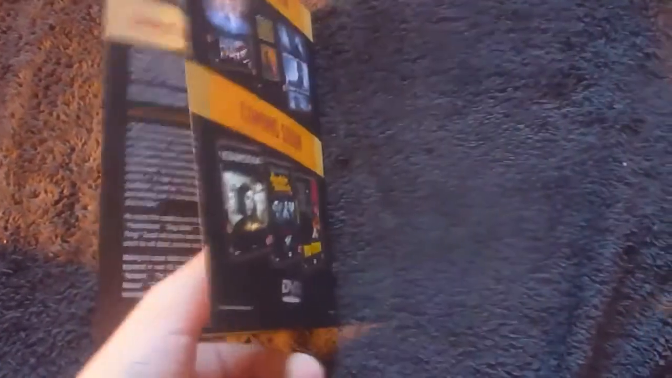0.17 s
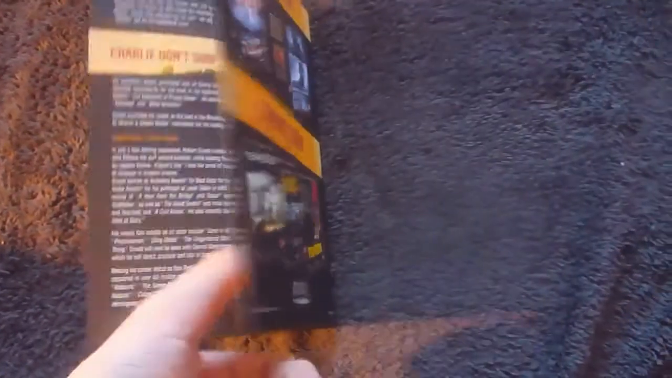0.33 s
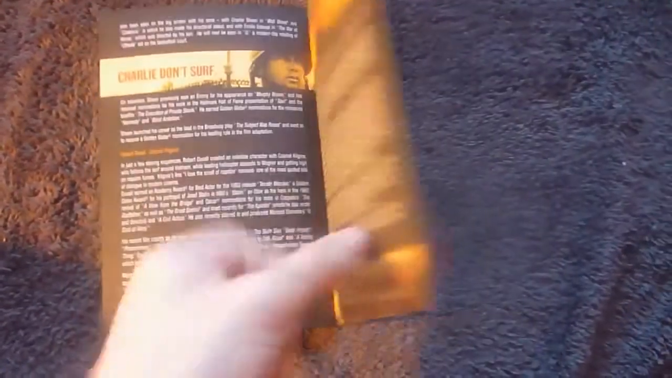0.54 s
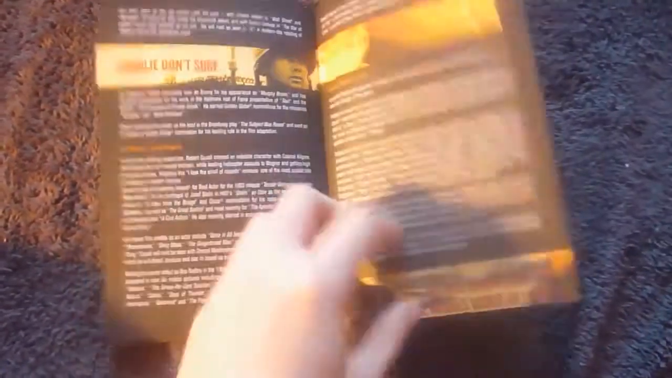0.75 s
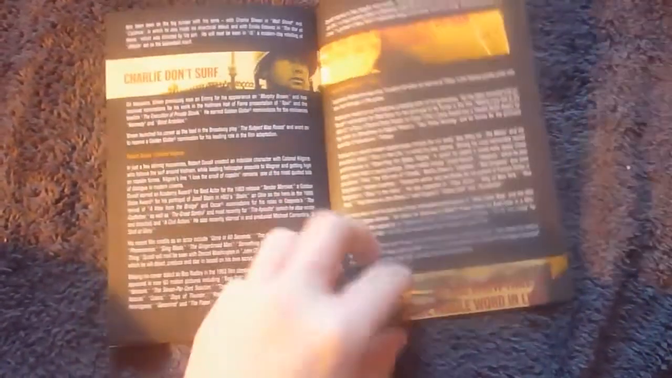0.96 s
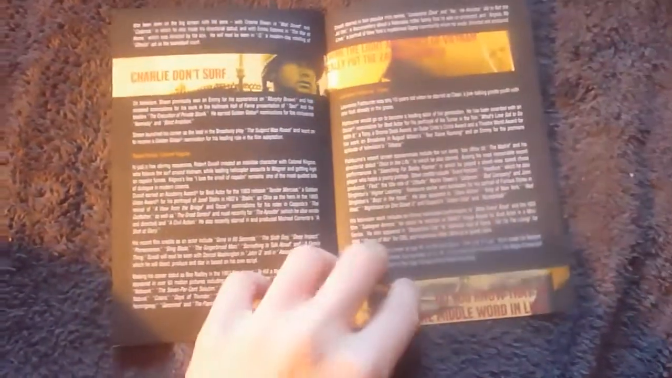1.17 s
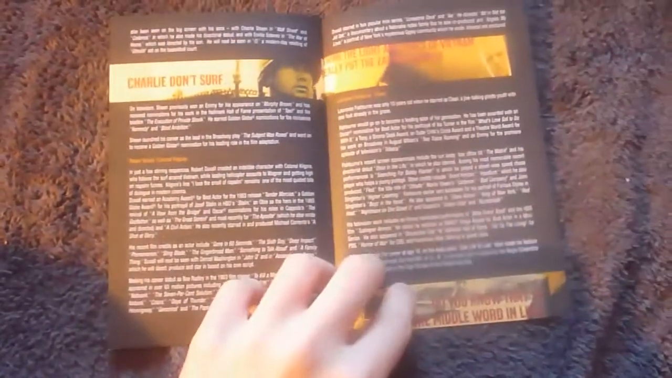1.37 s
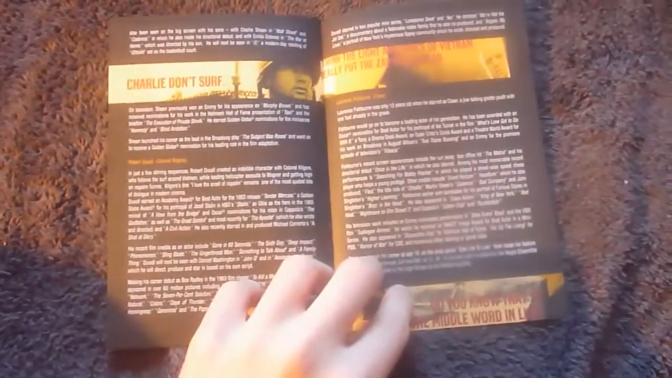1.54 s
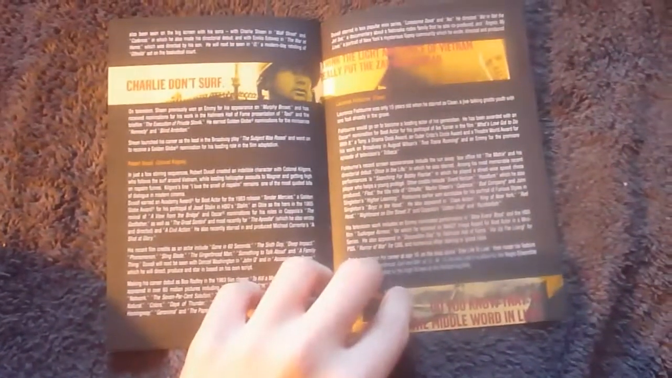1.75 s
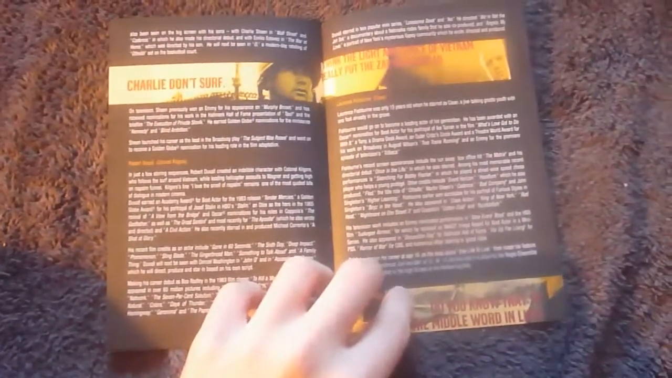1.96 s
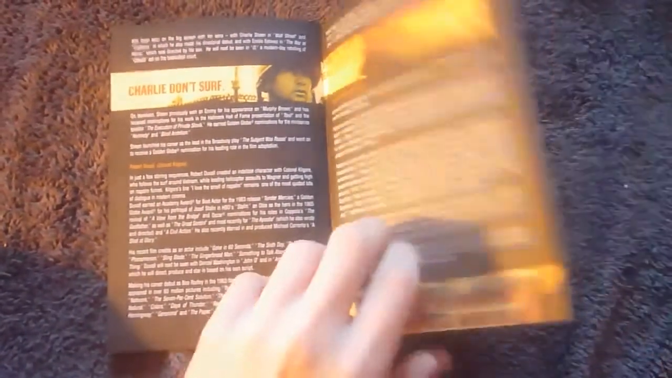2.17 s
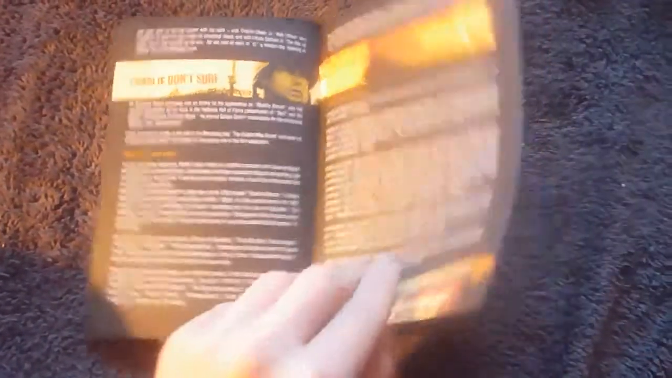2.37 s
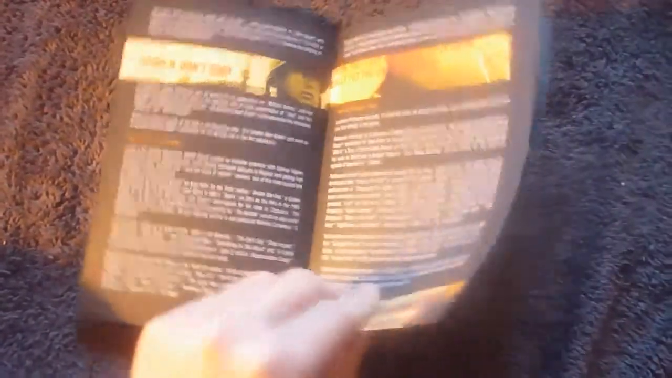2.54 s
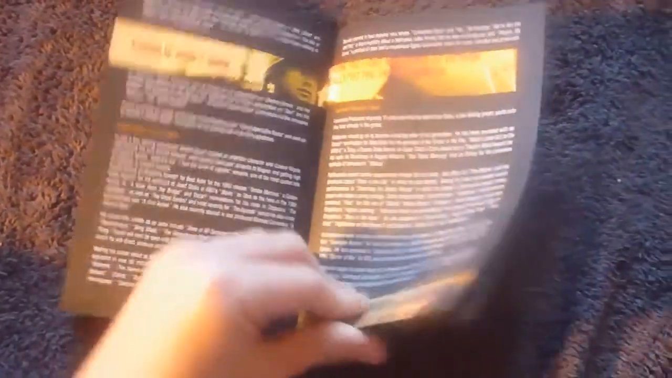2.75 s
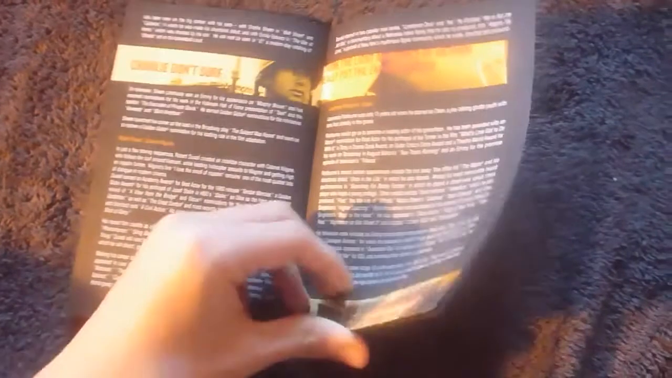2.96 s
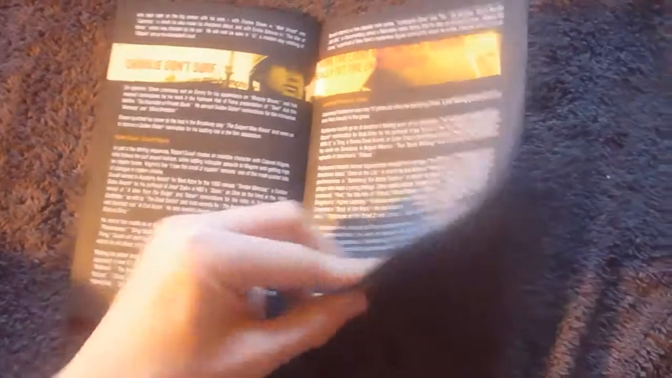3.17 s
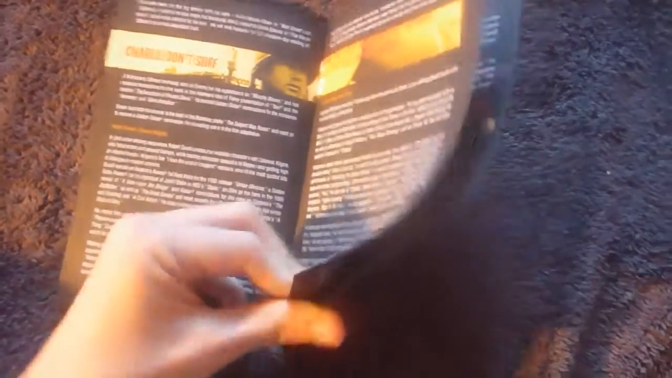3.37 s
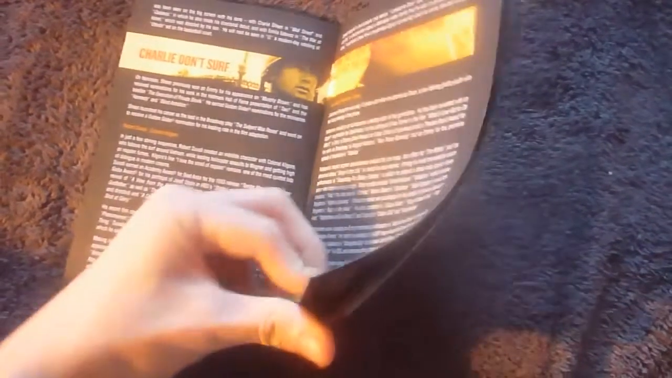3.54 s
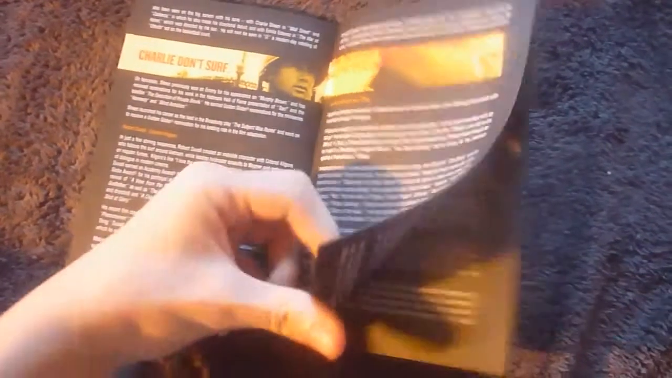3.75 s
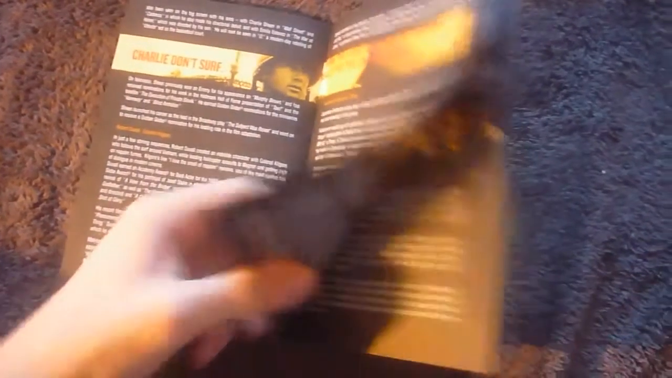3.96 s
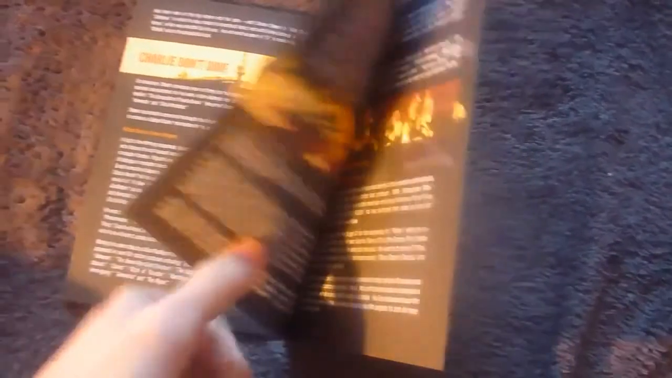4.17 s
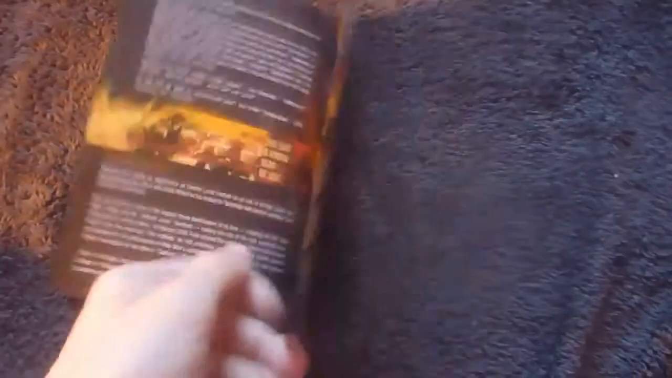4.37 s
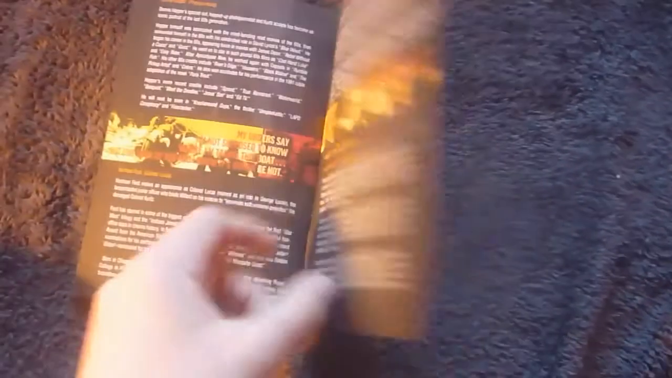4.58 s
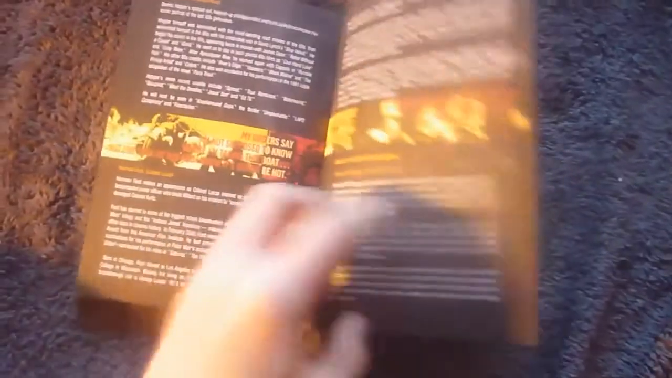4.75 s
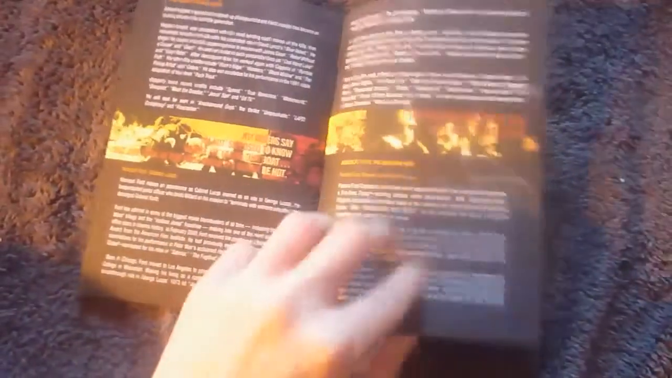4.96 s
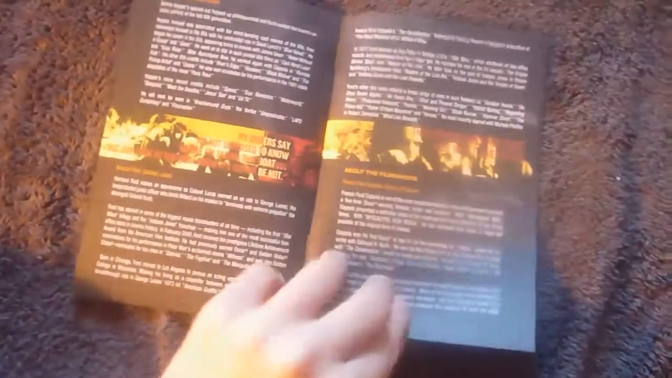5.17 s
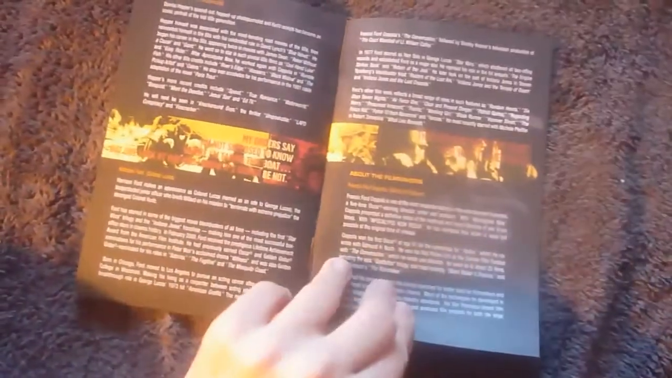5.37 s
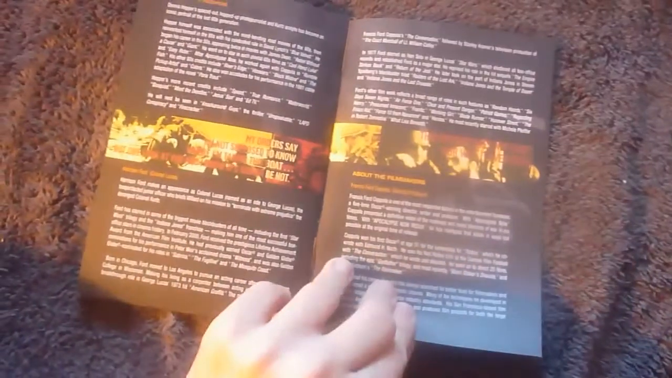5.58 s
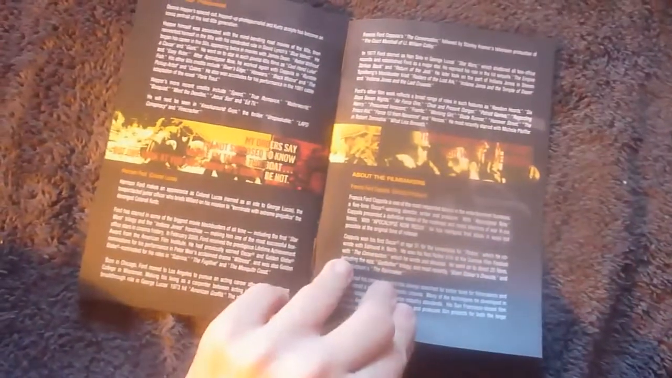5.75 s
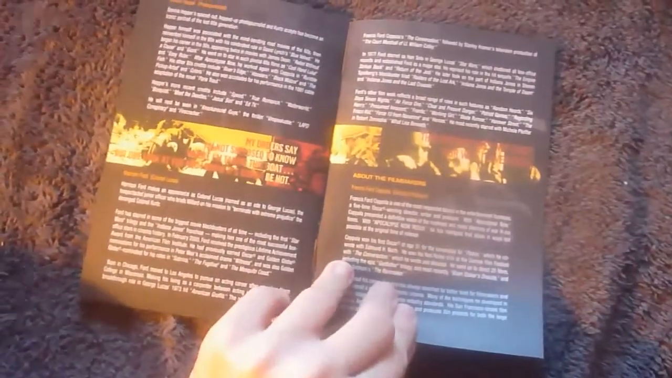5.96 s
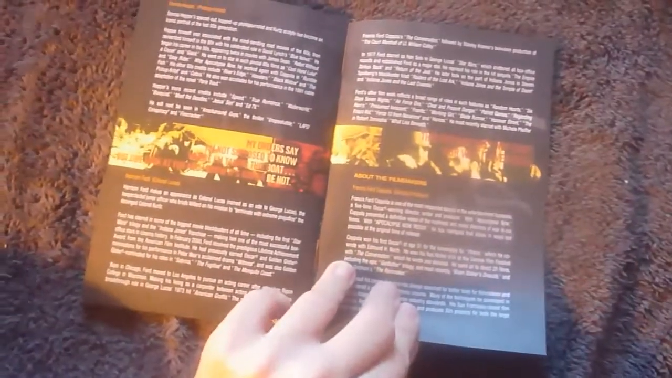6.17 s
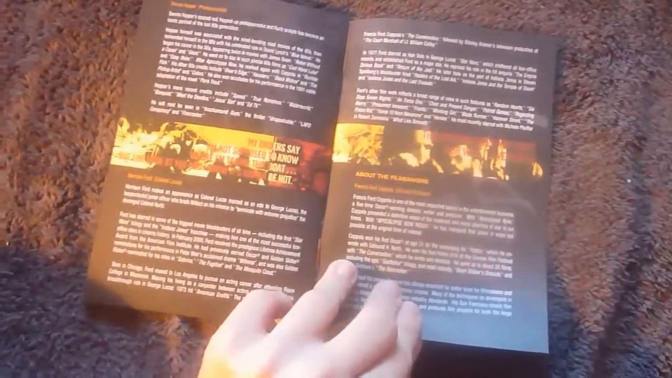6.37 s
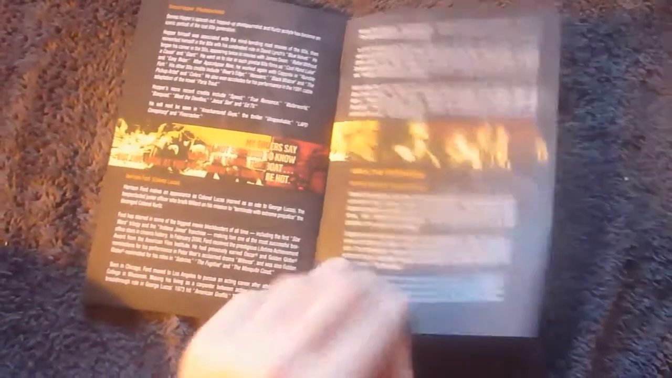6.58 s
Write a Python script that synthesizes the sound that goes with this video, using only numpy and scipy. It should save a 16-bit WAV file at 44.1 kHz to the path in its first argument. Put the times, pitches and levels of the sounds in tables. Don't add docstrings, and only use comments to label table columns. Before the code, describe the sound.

A thin glossy booklet is leafed through by hand on carpet in a quiet room, heard close on a small, slightly gritty microphone with continuous low hiss, rumble and faint wavering hum. Soft brushing at 0-0.3 s leads to a little flick near 0.4 and a light page flop with rustle at 0.7-1.2. Mostly hiss follows until a small brush and tick at 2.06. A sharp dry snap hits at 2.34, smaller snaps at 2.5, then bright sliding swishes at 2.55-2.7 and rubbing to 2.85. Another strong, crisp swish comes at 3.2, with softer rustles to 3.45 and a catching tick at 3.7. Faint gliding precedes the loudest hard slap and air puff at 4.38, then fluttering thuds at 4.54 and 4.65. Smoothing rustles run 4.8-5.3; a tiny tick at 5.5, quiet hiss, and a last faint tick and brush around 6.5-6.6.

```python
import sys
import numpy as np
from scipy import signal
from scipy.fft import rfft, irfft
from scipy.io import wavfile
from scipy.ndimage import uniform_filter1d, map_coordinates

SR = 44100
rng = np.random.default_rng(int(sys.argv[2]) if len(sys.argv) > 2 else 0)


def int16_out(signal):
    q = np.round(np.clip(np.atleast_2d(signal).T, -1, 1) * 32767)
    wavfile.write(sys.argv[1], SR, q.astype(np.int16))


def field_ratio(decibels):
    return 10 ** (np.asarray(decibels, dtype=float) / 20)


N = 291942


def evened(x):
    return x / np.sqrt(np.mean(x ** 2) + 1e-20)


def read(points, hz):
    f, value = np.transpose(points)
    return np.interp(np.log(hz + 1), np.log(f + 1), value)


def add(mix, s, sound):
    part = mix[round(s * SR):][:len(sound)]
    part += sound[:len(part)]


def resonate(x, hz, width):
    carrier = np.exp(2j * np.pi * np.cumsum(hz * np.ones(len(x))) / SR)
    decay = np.exp(-np.pi * width / SR)
    envelope = signal.lfilter([1 - decay], [1, -decay], x / carrier + 1e-18)
    return 2 * (carrier * envelope).real


def resonate_twice(x, hz, width):
    return resonate(resonate(x, hz, width), hz, width)


def drifting(noise, bands, frames):
    patches = uniform_filter1d(noise, bands, axis=0)
    return evened(uniform_filter1d(patches, frames, axis=1))


# (frequency [Hz], density [dB per Hz])
HISS_SPECTRUM = [(20, -44), (45, -24), (90, -17.5), (150, -13), (300, -15.5), (450, -19.5), (1200, -27),
                 (1450, -28.5), (2700, -35), (4500, -38), (7000, -42.5)]
# (frequency [Hz], width [Hz], level [dB])
DRONES = [
    (61.45, 1.6, -69),
    (125.5, 7.7, -68),
    (142.7, 9.2, -63.5),
    (236.8, 2.4, -64),
]


def hiss():
    hiss_db, patchy_db = -53, 1.0
    frames, hz = N // 256 + 5, np.fft.rfftfreq(1024, 1 / SR)
    a, b, noise = rng.standard_normal((frames, 513, 3)).T
    z = (a + 1j * b) * field_ratio(read(HISS_SPECTRUM, hz)[:, None] + patchy_db * drifting(noise, 10, 16))
    out = field_ratio(hiss_db) * evened(signal.istft(z, nperseg=1024, noverlap=768)[1][:N])
    for f, width, db in DRONES:
        out = out + field_ratio(db) * evened(resonate_twice(rng.standard_normal(N), f, width))
    return out


def pressure(rows, t):
    span_db, rounding = 10, 1.49
    power = np.full(len(t), 1e-12)
    for s, rise, fall, db in rows:
        before = (s - t) / max(rise, .001)
        after = (t - s) / max(fall, .001)
        u = np.where(t < s, before, after)
        power += field_ratio(db - span_db * u ** rounding) ** 2
    return power


def micro_slips():
    slips_per_s, spread_db, stutter_db = 9000, -1.5, 0.0
    slips = rng.standard_normal(N) * (rng.random(N) < slips_per_s / SR)
    slips *= field_ratio(spread_db * np.minimum(rng.exponential(1, N), 4))
    return slips * field_ratio(stutter_db * evened(uniform_filter1d(rng.standard_normal(N), 260)))


def coloured(x, spectrum):
    hz = np.fft.rfftfreq(len(x), 1 / SR)
    return evened(irfft(rfft(x) * field_ratio(read(spectrum, hz)), len(x)))


def flecked(x, fleck_db=2.5):
    z = signal.stft(x, nperseg=128)[2]
    noise = rng.standard_normal(z.shape[::-1]).T
    z = z * field_ratio(fleck_db * drifting(noise, 3, 14))
    return evened(signal.istft(z, nperseg=128)[1][:N])


# (start [s], length [s], first frequency [Hz])
PARTINGS = [
    (2.545, 0.23, 4530),
    (3.198, .17, 3320),
]


def gap_pitch(t):
    shut_hz, open_hz, parting_s = 3490, 2040, 0.022
    hz = np.full(len(t), float(shut_hz))
    for s, length, first_hz in PARTINGS:
        sink = open_hz + (first_hz - open_hz) * np.exp(-np.maximum(t - s, 0) / parting_s)
        hz = np.where((t > s - length / 2) & (t < s + length), sink, hz)
    return uniform_filter1d(hz, size=400)


def air_gap(slips, t):
    width, upper_hz, upper_db = 850, 2750, -4
    hz = gap_pitch(t)
    drive = slips * rng.choice([-1., 1.], N)
    lower = evened(resonate_twice(drive, hz, width))
    upper = evened(resonate_twice(drive, hz / 2 + upper_hz, width))
    return lower + field_ratio(upper_db) * upper


# (frequency [Hz], density [dB per Hz])
SLIDE_SPECTRUM = [(180, -46), (300, -24), (367, -52), (544, -79.5), (873, -54), (1520, -11.5), (2340, 2),
                  (7600, -6.5), (9880, -52), (16700, -120)]
# (peak time [s], rise [s], fall [s], level [dB])
BRUSHES = [(.18, 0.27, 0.054, -63), (.694, 0.081, 0.07, -65), (.8, 0.038, 0.2, -56), (1.03, .06, 0.06, -61),
           (2.056, 0.0099, .05, -52.5), (2.28, .15, .03, -66.5), (2.328, .02, .02, -62.5),
           (2.717, 0.0034, 0.063, -50), (2.795, 0.014, 0.018, -45), (2.83, .03, 0.073, -57),
           (3.006, 0.034, 0.12, -54.5), (3.34, 0.031, 0.026, -48.5), (3.415, 0.029, .06, -50),
           (3.717, 0.006, 0.038, -53), (4.338, 0.0087, 0.079, -47.5), (4.824, 0.033, 0.025, -51.5),
           (4.868, 0.026, 0.056, -50), (5.08, .15, 0.051, -53), (5.176, .04, .02, -60.5),
           (5.292, 0.012, 0.023, -50), (6.59, 0.014, .1, -58)]
# (peak time [s], rise [s], fall [s], level [dB])
GLIDES = [(1.165, 0.058, 0.016, -48), (3.312, .03, .02, -43), (2.555, 0.018, 0.021, -34.5),
          (2.618, 0.054, 0.035, -34.5), (2.662, 0.028, 0.019, -37), (3.182, 0.014, 0.024, -43),
          (3.192, 0.0043, 0.078, -31), (3.262, 0.06, 0.024, -36), (3.6, 0.16, 0.13, -57.5),
          (3.94, 0.05, 0.11, -53), (4.03, .03, 0.0089, -55), (4.083, 0.022, 0.044, -55),
          (4.142, 0.019, .006, -53)]
# (peak time [s], rise [s], fall [s], level [dB])
SETTLES = [
    (.37, 0.0088, 0.04, -73),
    (.82, .012, 0.027, -63.5),
    (2.346, .004, 0.027, -51),
    (4.39, 0.0083, 0.019, -55),
    (4.43, 0.025, 0.061, -59),
    (4.548, 0.009, 0.053, -58),
    (4.66, 0.0071, .06, -58),
]


def strokes():
    gap_db, body_hz, body_width = 4.5, 1150, 1380
    body_db = [0, -12, 11.5]
    t = np.arange(N) / SR
    slips = micro_slips()

    coarse = t[::32]
    powers = np.array([pressure(rows, coarse) for rows in (BRUSHES, GLIDES, SETTLES)])
    level = np.interp(t, coarse, np.sqrt(powers.sum(axis=0)))
    body_level = np.interp(t, coarse, np.sqrt(field_ratio(body_db) ** 2 @ powers))

    share = field_ratio(gap_db + .55 * (20 * np.log10(level) + 36))
    gap = air_gap(slips, t)
    paper = flecked(coloured(slips, SLIDE_SPECTRUM))
    slide = (paper + share * flecked(gap, fleck_db=0.5)) / np.sqrt(1 + share ** 2)
    body = evened(resonate_twice(slips, body_hz, body_width))
    return level * slide + body_level * body


# (frequency [Hz], t60 [s])
ROOM_DECAY = [(250, 0.52), (700, 0.16), (1800, 0.41), (4600, 0.26)]
# (frequency [Hz], level [dB])
CARPET_COLOUR = [(500, 7), (2500, -5.5), (5000, -2.5)]


def room(x):
    taps = np.zeros(SR // 2)
    at = np.arange(120, SR // 2 - 20, 20)
    taps[at + rng.integers(0, 20, len(at))] = rng.choice([-1., 1.], len(at))
    hz, t, z = signal.stft(taps, SR, nperseg=128)
    decay_db = read(CARPET_COLOUR, hz)[:, None] - 60 * t / read(ROOM_DECAY, hz)[:, None]
    tail = signal.istft(z * field_ratio(decay_db), SR, nperseg=128)[1]
    return signal.fftconvolve(x, tail / np.linalg.norm(tail))[:N]


def buckle(row, noise):
    flutter_db, upper_db, tick_s, soft_width = -16, -10, 0.0018, 900
    s, peak_db, hz, t60, tick_db, flutter_t60 = row
    t = np.arange(len(noise)) / SR
    drive = field_ratio(flutter_db - 60 * t / max(flutter_t60, .003)) * noise
    drive[0] += 1
    half_cycle = np.hanning(round(SR / hz / 2) + 2)
    drive = np.convolve(drive, half_cycle)[:len(t)]

    width = 5.1 / max(t60, .002)
    ring = resonate(resonate(drive, hz, soft_width), hz, width)
    overtone = resonate(resonate(drive, 2.02 * hz, soft_width), 2.19 * hz, 2 * width)
    ring = ring / abs(ring).max() + field_ratio(upper_db) * overtone / abs(overtone).max()
    tick = resonate(noise[::-1], 2600, 2900) * (t / tick_s) * np.exp(1 - t / tick_s)
    return s + 0.00088, field_ratio(peak_db) * (ring + field_ratio(tick_db) * tick)


# (time [s], peak level [dB], ring frequency [Hz], ring t60 [s])
FLICKS = [(.388, -39, 696, 0.0061), (.806, -37, 603, 0.011), (.812, -33, 660, 0.0056),
          (.827, -36, 910, 0.015), (.884, -43, 1470, .012), (2.3439, -26.5, 1410, .008),
          (2.348, -25, 800, 0.0089), (2.361, -35, 1300, 0.011), (2.624, -25, 2400, 0.011),
          (2.803, -38, 1350, 0.014), (3.332, -37, 1040, 0.015), (4.3722, -29, 450, 0.0062),
          (4.3764, -27, 450, 0.0043), (4.415, -39, 955, 0.023), (4.536, -31, 750, 0.014),
          (4.558, -33, 586, 0.013), (4.649, -34.5, 1060, 0.011), (4.652, -27, 730, 0.041),
          (4.668, -28.5, 794, .025), (4.685, -34.5, 600, .018), (4.869, -36.5, 1800, 0.0082)]


def flicks():
    tick_db, flutter_t60 = -27, 0.051
    return [(s, db, hz, t60, tick_db, flutter_t60) for s, db, hz, t60 in FLICKS]


# (time [s], peak level [dB], ring frequency [Hz], tick against the peak [dB])
TICKS = [
    (.781, -37.5, 706, -11),
    (.861, -44, 1160, -9),
    (2.065, -38, 1180, -5),
    (2.749, -35.5, 692, -13),
    (3.084, -40.5, 1370, -7),
    (3.709, -32, 646, -3.5),
    (4.338, -42, 1500, -12),
    (4.4, -48, 1090, -14),
    (5.496, -54.5, 600, 9.5),
    (6.517, -51, 540, 3.5),
]


def edge_ticks():
    ring_t60, flutter_t60 = 0.0088, .045
    return [(s, db, hz, ring_t60, tick_db, flutter_t60) for s, db, hz, tick_db in TICKS]


# (time [s], peak level [dB], ring frequency [Hz], ring t60 [s], tick against the peak [dB])
SNAPS = [(2.3379, -14.5, 990, 0.005, -29), (2.4905, -38, 810, .013, -16), (2.5024, -28.5, 750, 0.0052, -12),
         (2.5058, -26, 900, 0.0091, -12), (2.709, -27.5, 820, 0.0053, -8),
         (4.3803, -11.5, 2070, 0.0064, -18), (4.3805, -18, 800, 0.007, -35),
         (4.381, -14.5, 3020, 0.0034, -34), (4.3835, -11, 1115, 0.015, -40),
         (4.386, -23.5, 1470, 0.036, -38), (4.539, -38.5, 2170, .012, -8), (4.543, -28.5, 1090, 0.02, -35)]


def snaps():
    flutter_t60 = 0.017
    return [(*row, flutter_t60) for row in SNAPS]


def sheet_blows():
    rows = flicks() + edge_ticks() + snaps()
    out = np.zeros(N)
    for row, noise in zip(rows, rng.standard_normal((len(rows), 4000))):
        add(out, *buckle(row, noise))
    return signal.lfilter(*signal.butter(N=2, Wn=250, btype="high", fs=SR), out)


# (time [s], level [dB], rise [s], sag [s])
SLAP_PUFF = (4.383, -28.5, .006, .062)


def puff():
    s, db, rise, sag = SLAP_PUFF
    u = np.maximum(np.arange(N) / SR - s, 0) / sag
    return field_ratio(db) * uniform_filter1d((u > 0) * (1 - u) * np.exp(-u), round(rise * SR))


def scene():
    floor, rubbing, blows = hiss(), strokes(), sheet_blows()
    echo = room(field_ratio(-11.0) * blows + field_ratio(-10.0) * rubbing)
    return (floor + rubbing + blows + echo + puff())[None]


def roll_off(x):
    return signal.sosfilt(signal.butter(12, 16650, fs=SR, output="sos"), x)


def record(dry):
    sample_hz, edge_hz, top_hz, offset = 16006.06, 7590, 15750, .0076
    smooth = signal.oaconvolve(dry[0], signal.firwin(255, edge_hz, fs=SR), "same")
    held = np.floor(np.arange(N) * sample_hz / SR) * SR / sample_hz
    steps = map_coordinates(smooth, [held], order=3)
    band_limit = signal.firwin(511, top_hz, window=("kaiser", 9), fs=SR)
    steps = signal.oaconvolve(steps, band_limit, "same")
    return roll_off(steps[None] + offset)


dry = scene()
out = record(dry)
int16_out(out)
```